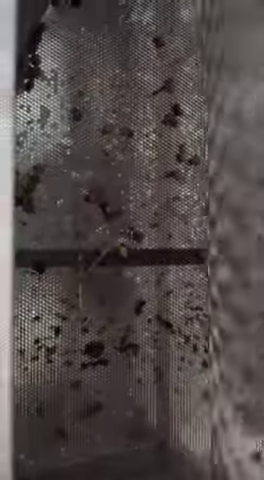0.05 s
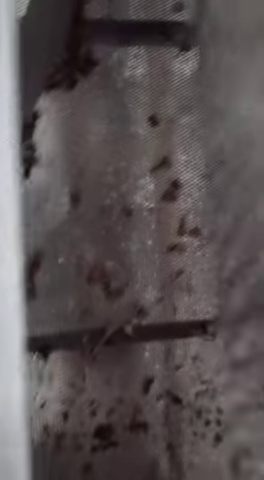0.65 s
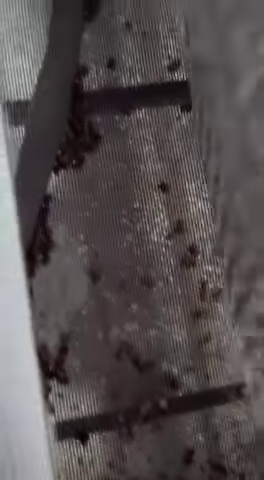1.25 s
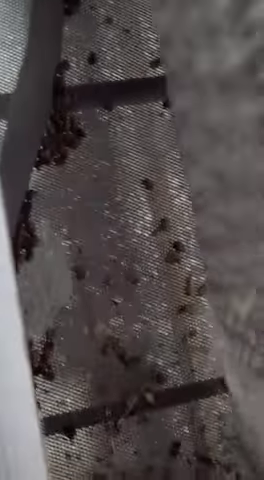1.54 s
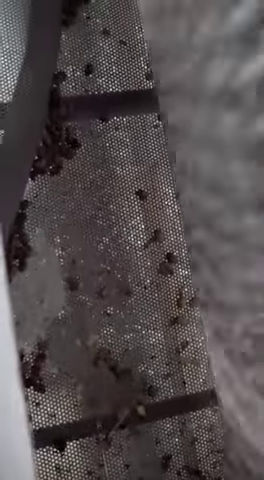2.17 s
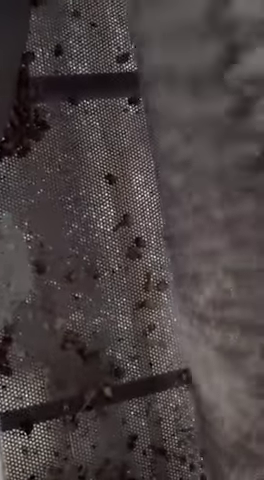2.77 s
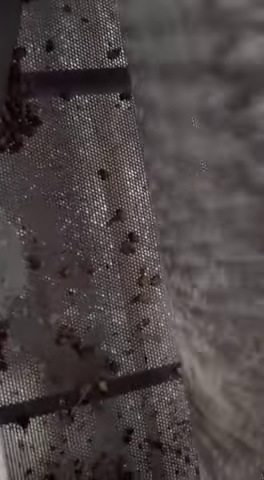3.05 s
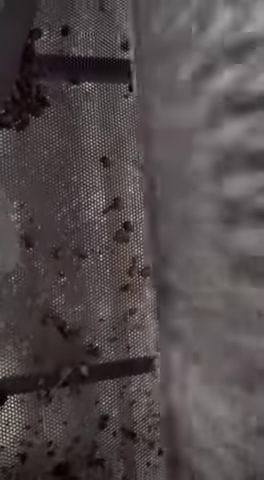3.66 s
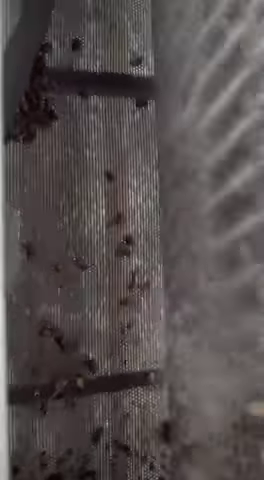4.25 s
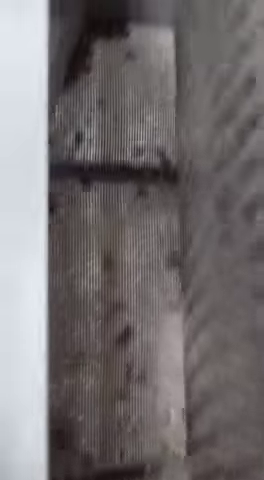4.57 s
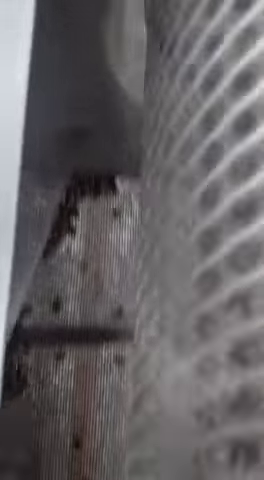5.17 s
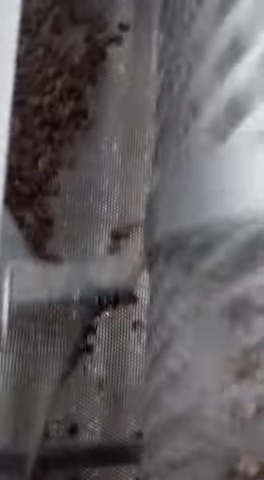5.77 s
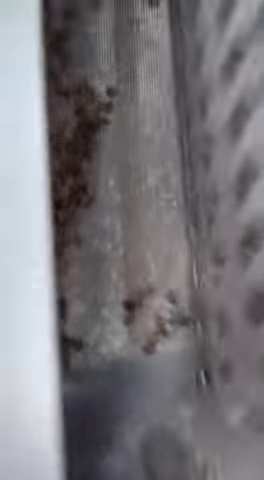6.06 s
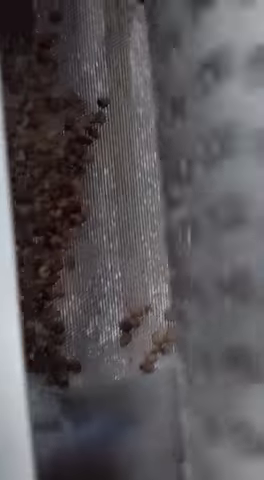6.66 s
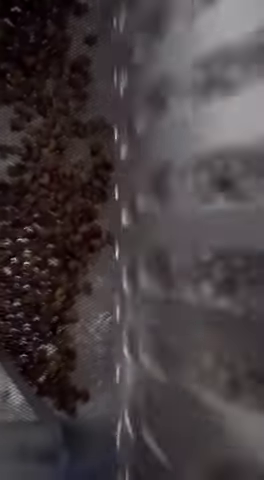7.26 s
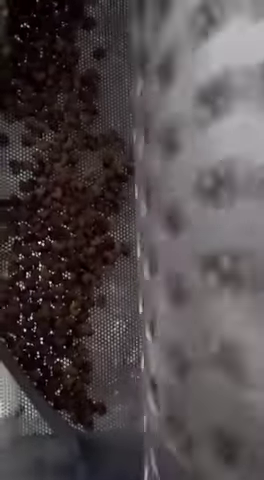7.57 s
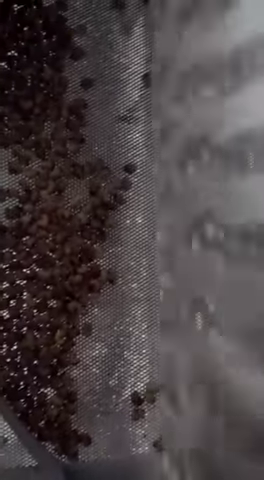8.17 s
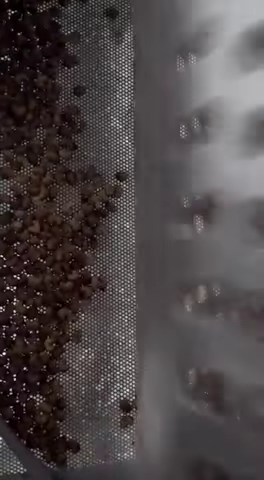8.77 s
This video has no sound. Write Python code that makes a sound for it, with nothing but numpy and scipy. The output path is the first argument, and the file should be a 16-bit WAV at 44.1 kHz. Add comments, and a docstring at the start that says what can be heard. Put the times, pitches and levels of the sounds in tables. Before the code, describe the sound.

A sorting machine runs loudly up close, with nuts sliding over wire mesh in a dense rattle that surges about once a second. The steel frame roars and rings, shells hiss, and a few single nuts tick above a rumbling drive and soft low thuds. Halfway through, the microphone moves from the bare screen to a heap of nuts, where the ringing fades a little and hollow notes swell from the trough.

```python
"""A dense rattle of nuts sliding over wire mesh, surging about once a second: a sorting machine up close.
The load drums on the sheet-steel frame, which roars and rings; shells hiss and a few single nuts tick.
Underneath, the drive rumbles and soft low thuds come and go. Halfway through, a strongly widened stereo
microphone moves from the bare screen to the heap, where the trough swells with a hollow note."""
import sys
import numpy as np
from scipy import signal
from scipy.fft import rfft, irfft, next_fast_len
from scipy.io import wavfile
from scipy.ndimage import uniform_filter1d, map_coordinates

SR = 44100
rng = np.random.default_rng(int(sys.argv[2]) if len(sys.argv) > 2 else 0)


def persist_wave(psi):
    """Save psi, clipped to +-1, as 16-bit WAV."""
    counts = np.round(np.clip(psi, -1, 1) * 32767).astype(np.int16)
    wavfile.write(sys.argv[1], SR, np.atleast_2d(counts).T)


N = 388962


# sprays of shells skidding across the wire: crest t/s, length/s, rise/dB
SPRAYS = [(1.26, .18, 1), (1.65, .2, 1), (2.25, 0.18, 0.8), (2.86, 0.14, 1.5), (3.28, 0.33, 1.1),
          (4.41, 0.13, 0), (4.6, .14, 0), (4.82, 0.26, 2.4), (5.12, .18, 2.5), (5.65, 0.17, 3),
          (5.9, .24, 0), (6.64, 0.34, 1.2), (6.95, 0.13, 1.5), (7.74, .22, 1), (8.06, .24, -0.2),
          (8.53, 0.13, 3.3)]
# rattle colour over the bare screen and over the heap: f/Hz, level/dB
SCREEN_RATTLE = [(700, -55), (1600, -2), (2200, 1), (2600, 2.5), (2950, -3), (3400, -0.9), (4200, -10),
                 (5000, -17), (6300, -17), (9000, -25.5), (15000, -65)]
HEAP_RATTLE = [(700, -52), (1600, -6.5), (2200, 1.5), (2600, -0.5), (2950, 0), (3400, 0.5), (4200, -10),
               (5000, -10), (6300, -21), (9000, -29), (15000, -52)]
def rattle():
    """Shells clatter together in a bright, dense stream that lifts with each spray."""
    clatter = along_screen(contacts(rate=30000, spread_db=2.0), SCREEN_RATTLE, HEAP_RATTLE)
    rattle_db = level(screen_db=-14.5, heap_db=-15, follows=0.044) + 0.76 * swells(SPRAYS)
    return amp(rattle_db + 0.78 * wobble(16)) * clatter


# batches of nuts tumbling onto the frame: crest t/s, length/s, rise/dB
TUMBLES = [(.27, 0.2, 1.5), (.98, 0.18, 0.5), (1.38, .1, -1), (1.66, 0.095, 1), (1.87, .14, -0.5),
           (2.05, 0.086, 2.5), (2.22, 0.24, 0), (2.81, 0.24, 1), (3.15, 0.26, 1.5), (3.76, .12, 0),
           (4.05, 0.23, 2), (4.44, .1, 2), (5.07, .15, 1.5), (5.32, .18, 2), (6.14, 0.41, 3.5),
           (6.44, .2, 1), (6.83, 0.31, 5), (7.45, .14, 1), (8.12, .14, 1.5), (8.73, 0.26, 6.5)]
# roar colour over the bare screen and over the heap: f/Hz, level/dB
SCREEN_ROAR = [(300, -25), (720, -6), (1100, -1), (1450, 1), (1800, 1), (2500, 0), (3000, -21), (4500, -40),
               (9000, -62)]
HEAP_ROAR = [(300, -29), (720, -10), (1000, -6.5), (1280, -3.5), (1450, -3.5), (1620, -1.5), (1800, -1),
             (2100, -5.5), (2550, -5), (3000, -25), (4500, -23.5), (9000, -72)]
def roar():
    """The sliding load drums on the steel frame and booms when a batch tumbles."""
    drumming = along_screen(contacts(rate=22000, spread_db=1.5), SCREEN_ROAR, HEAP_ROAR)
    roar_db = level(screen_db=-18, heap_db=-18, follows=0.46) + swells(TUMBLES)
    return amp(roar_db + 0.59 * wobble(22)) * drumming


# ringing modes of the steel panels: f/Hz, width/Hz, level/dB
PANEL_MODES = [(820, 22, -13), (926, 12, -5), (1050, 28, -10.5), (1247, 23, 0), (1535, 28, -2),
               (2010, 30, -2.5), (2580, 90, -5.5)]
# shakes that make the panels ring louder: crest t/s, length/s, rise/dB
SHAKES = [(.3, .42, 6), (.99, .24, 4.5), (1.39, .12, 7), (1.91, .2, 5.5), (2.21, .16, 9), (2.83, .2, 5.5),
          (3.18, .2, 6), (3.55, .14, 4.5), (3.77, .17, 6.5), (3.92, .14, 5)]
def panels():
    """Each panel mode sings as a wavering tone that swells when shaken, fainter over the heap."""
    shake_db = swells(SHAKES) + 0.33 * swells(TUMBLES)
    ring = sum(amp(db) * singing(hz, width_hz, evenness=.35, waver_hz=5)
               for hz, width_hz, db in PANEL_MODES)
    return amp(level(screen_db=-27.5, heap_db=-32.5, follows=0.14) + shake_db) * ring


# hollow notes of the trough: crest t/s, length/s, f/Hz, level/dB
HOLLOW_NOTES = [(5.89, 0.46, 1660, -18.5), (5.892, 0.26, 3300, -22), (6.84, 0.28, 1750, -17),
                (7.418, 0.18, 2060, -16.5), (7.756, 0.24, 1820, -15.5), (7.76, .3, 2580, -29),
                (7.76, 0.25, 3150, -24), (8.09, 0.49, 1880, -17), (8.062, 0.41, 2530, -21),
                (8.757, 0.21, 1820, -17)]
def trough():
    """The sliding heap sets the trough resonating: hollow bands swell and fade at varying pitches."""
    return sum(amp(db) * swells([(s, length, 1)]) * resonance(hz, width_hz=190)
               for s, length, hz, db in HOLLOW_NOTES)


# colour of sliding shells: f/Hz, level/dB
SLIDE_COLOUR = [(2500, -37), (3900, 1.5), (4400, 1.5), (5100, 0), (6000, -12.5), (7500, -35)]
def slide():
    """Shells slide over the mesh with a thin rasp, strongest over the bare screen."""
    slide_db = level(screen_db=-29, heap_db=-33.5, follows=0.5) + swells(SPRAYS) + 1.5 * wobble(20)
    return amp(slide_db) * coloured(contacts(rate=20000, spread_db=2.5), SLIDE_COLOUR)


# colour of brushed wire: f/Hz, level/dB
HISS_COLOUR = [(3000, -37), (6000, -2), (7200, -1), (8800, 2.5), (10000, 1.2), (11500, -6), (13000, -12),
               (14700, -12.5), (15500, -12)]
def hiss():
    """Shells brush the wires: an airy top that rides the surges and sprays."""
    hiss_db = level(screen_db=-32, heap_db=-28.5, follows=0.77) + swells(SPRAYS) + 1.1 * wobble(21)
    return amp(hiss_db) * coloured(contacts(rate=39000, spread_db=3.5), HISS_COLOUR)


# colour of the finest grit: f/Hz, level/dB
SIZZLE_COLOUR = [(9000, -35), (11500, -3), (12800, -3), (14000, -11), (15500, -10)]
def sizzle():
    """Fine shell grit sizzles on the wires, flaring with each surge and spray."""
    grit = coloured(contacts(rate=9800, spread_db=4.0), SIZZLE_COLOUR)
    flare_db = 1.5 * swells(SPRAYS) - swells(LULLS) + 2.0 * wobble(14)
    return amp(level(screen_db=-49, heap_db=-42.5, follows=0.88) + flare_db) * grit


# single nuts striking nearby: t/s, level/dB
NUT_HITS = [(1.1019, -24), (1.8474, -27), (4.3844, -23), (4.8654, -27), (5.1664, -30), (6.5294, -28),
            (6.6124, -27), (7.7464, -25)]
def ticks(t60, gain_db):
    """Single nuts hit the steel: short, bright bursts."""
    bright = coloured(noise(), [(1000, -25), (3500, -2), (9000, 17), (15000, -17)])
    return amp(gain_db) * blows(NUT_HITS, t60) * bright


# colour of the drive: f/Hz, level/dB
RUMBLE_COLOUR = [(20, -46), (70, -25), (105, -14), (140, -6.5), (175, -10), (220, -2.5), (300, -2),
                 (400, 0), (550, 1), (700, -4), (1100, -6), (2000, -18), (5000, -45)]
# low modes of the frame: f/Hz, width/Hz, level over the screen/dB, level over the heap/dB
FRAME_MODES = [(300, 18, -46, -44), (362, 18, -37.5, -47), (395, 24, -41.5, -43), (490, 35, -38.5, -40.5),
               (620, 35, -43, -42.5)]
def drive():
    """The drive rumbles and the frame's low drone comes and goes, both heavier under the load."""
    rumble_db = level(screen_db=-31.5, heap_db=-37.5, follows=0.078) + 0.63 * wobble(5.4)
    rumble = amp(rumble_db) * coloured(noise(), RUMBLE_COLOUR)
    drone = 0
    for hz, width_hz, screen_db, heap_db in FRAME_MODES:
        drift = unit(amp(2.5 * wobble(5)))
        drone += amp(level(screen_db, heap_db, follows=1.0)) * drift * resonance(hz, width_hz)
    return amp(1.1 * swells(TUMBLES)) * (rumble + drone)


# soft, dull thuds: t/s, level/dB
THUDS = [(.47, -17), (.975, -24), (1.09, -22.5), (2.082, -16.5), (2.32, -25), (3.83, -21), (4.84, -24),
         (5.389, -26), (5.769, -25), (6.94, -22), (7.694, -23), (7.79, -13.5), (7.96, -22.5), (8.54, -18),
         (8.7, -17.5)]
def thuds():
    """Soft, dull low thuds, nearly alike at both microphone ports and half buried in the roar."""
    centred = rng.standard_normal(N) + .25 * noise()
    dull = coloured(centred, [(25, -32), (55, -10), (100, 0), (260, 2), (600, -15), (2000, -80)])
    return blows(THUDS, t60=.12) * dull


# colour of a soft jolt of the housing: f/Hz, level/dB
KNOCK_COLOUR = [(25, -25), (60, -11), (130, -3), (230, 0), (330, -3), (560, -6), (900, -30), (2000, -70)]
def knocks(rate, t60, spread_db, gain_db):
    """The shaking housing jolts at uneven moments: soft, low knocks that make the rumble flutter."""
    struck = rng.random(N) < rate / SR
    size = amp(spread_db * np.clip(rng.standard_normal(N), -1.5, 1.5))
    fade = amp(-60 * np.arange(SR // 2) / SR / t60)
    power = np.abs(signal.fftconvolve((struck * size) ** 2, fade ** 2)[:N])
    jolts = unit(np.sqrt(power) * coloured(noise(), KNOCK_COLOUR))
    return amp(level(gain_db, gain_db, follows=0.067)) * jolts


# the load surges over the mesh: crest t/s, length/s, rise/dB
SURGES = [(.27, 0.43, 3), (.98, 0.59, 5.5), (1.92, 0.58, 3), (2.86, 0.45, 4), (3.99, 0.96, 2),
          (4.94, 0.86, 3.5), (5.9, 0.5, 3.5), (6.74, 0.81, 4), (7.8, 0.89, 3.5), (8.69, 0.77, 4.5)]
# the flow slackens: lowest point t/s, length/s, fall/dB
LULLS = [(.58, 0.28, 2), (1.49, 0.53, 1.2), (2.48, 0.2, 1.4), (3.02, .1, 0.5), (3.48, 0.19, 1),
         (5.46, 0.14, 2.5), (7.1, 0.23, 0.5), (7.3, 0.14, 1.5), (7.55, 0.13, .8), (8.3, 0.41, 0.7),
         (8.61, 0.22, 2)]
def level(screen_db, heap_db, follows):
    """A layer's fader in dB: set by mic position, up `follows` dB per dB of surge, down in the lulls."""
    return screen_db + (heap_db - screen_db) * mic_position() + follows * swells(SURGES) - swells(LULLS)


# the microphone's move: t/s, position (0 over the bare screen, 1 over the heap)
MIC_PATH = [(0, 0), (4.2, 0), (5.0, .6), (5.8, 1), (8.82, 1)]
def mic_position():
    """Where the microphone is at each sample."""
    return np.interp(np.arange(N) / SR, *np.transpose(MIC_PATH))


def along_screen(x, at_screen, at_heap):
    """Crossfades the colour of x as the microphone moves from the bare screen to the heap."""
    position = mic_position()
    return (1 - position) * coloured(x, at_screen) + position * coloured(x, at_heap)


def contacts(rate, spread_db):
    """Random tiny impacts, rate a second: mostly weak, a few strong, shared unevenly by the ports."""
    struck = rng.random(N) < rate / SR
    size = amp(spread_db * np.clip(rng.standard_normal(N), -2, 2))
    return unit(struck * size * noise())


def resonance(centre_hz, width_hz):
    """A randomly shaken mode at rms 1; its skirts fall steeply."""
    return unit(filtered(noise(), lambda hz: 1 / (1 + ((hz - centre_hz) / width_hz) ** 2)))


def singing(centre_hz, width_hz, evenness, waver_hz):
    """A ringing mode: the shaking holds its strength partly even while its pitch wavers."""
    ring = signal.hilbert(resonance(centre_hz, width_hz), next_fast_len(N))[:, :N]
    waver = np.exp(2j * np.pi * np.cumsum(waver_hz * wobble(9)) / SR)
    return unit(np.real(ring * waver) / (np.abs(ring) + 1e-3) ** evenness)


def blows(rows, t60):
    """The envelope of sudden blows that each die away by 60 dB in t60 seconds."""
    t = np.arange(N) / SR
    return sum(amp(db - 60 * np.abs(t - s) / t60) * (t >= s) for s, db in rows)


def swells(rows):
    """Smooth rises and falls of the given heights, each centred on its time."""
    t = np.arange(N) / SR
    return sum(height * np.cos(np.pi * np.clip((t - s) / length, -.5, .5)) ** 2
               for s, length, height in rows)


def wobble(rate):
    """A smooth random curve, rate knots a second."""
    return map_coordinates(rng.standard_normal(int(N * rate / SR) + 4), [np.arange(N) * rate / SR])


def noise():
    """Unrelated noise at the two ports."""
    return rng.standard_normal((2, N))


def coloured(x, spectrum):
    """x given a spectrum's shape, at rms 1."""
    return unit(filtered(x, lambda hz: amp(along(spectrum, hz))))


def filtered(x, response):
    """x times a complex response of frequency."""
    size = next_fast_len(N + SR // 2)
    return irfft(rfft(x, size) * response(np.fft.rfftfreq(size, 1 / SR)), size)[..., :N]


def along(points, hz):
    """Joins (f/Hz, value) points on a log frequency axis."""
    freqs, values = np.transpose(points)
    return np.interp(np.log(hz + 1), np.log(freqs + 1), values)


def amp(db):
    return 10 ** (np.asarray(db) / 20)


def unit(x):
    return x / np.sqrt(np.mean(x ** 2) + 1e-20)


def scene():
    """The machine as it reaches the microphone's two ports."""
    low_end = drive() + thuds() + knocks(rate=9, t60=.16, spread_db=2.5, gain_db=-37.5)
    nuts = rattle() + roar() + slide() + hiss() + sizzle()
    return nuts + panels() + trough() + ticks(t60=0.082, gain_db=-1) + low_end


# crossfeed between the ports: f/Hz, share subtracted (negative: added)
CROSSFEED = [(50, 0.76), (150, 1), (500, 0.7), (1150, 0.44), (1800, 0.78), (2600, 0.2), (3200, 0.54),
             (4600, 0.33), (6400, 0.53), (8200, 0.32), (9500, 0.4), (10800, -0.16), (12000, -0.35),
             (15000, -0.67)]
# EQ that thins the low notes in the centre: f/Hz, level/dB
MID_EQ = [(50, 0), (110, -3), (170, -10), (220, -20), (270, -19), (350, -10.5), (500, -8), (750, -5),
          (1300, 0)]
def widen(ports, delay_ms):
    """Each side loses a delayed copy of the other, so bands alternate between centred and wide."""
    left, right = ports
    feed = lambda hz: along(CROSSFEED, hz) * np.exp(-2j * np.pi * hz * delay_ms / 1000)
    trim = lambda hz: 1 / np.sqrt(1 + along(CROSSFEED, hz) ** 2)  # offsets the power the feed adds
    mid = filtered((left + right) / 2, lambda hz: (1 - feed(hz)) * trim(hz) * amp(along(MID_EQ, hz)))
    side = filtered((left - right) / 2, lambda hz: (1 + feed(hz)) * trim(hz))
    return np.array([mid + side, mid - side])


def gain_control(x, threshold_db, slope, average_s):
    """The whole mix ducks by `slope` dB for each dB its average power passes the threshold."""
    power = np.abs(uniform_filter1d(np.mean(x ** 2, axis=0), int(average_s * SR)))
    over_db = np.maximum(10 * np.log10(power + 1e-12) - threshold_db, 0)
    return x * amp(-slope * over_db)


# stereo balance, leaning mostly left: f/Hz, left minus right/dB
BALANCE = [(300, .8), (900, 1.8), (2000, .1), (3200, 2.4), (6500, 1.4), (8700, -.5), (11500, 2.2)]
def record(dry):
    """Stereo widening, a slightly louder left side, gain control, rounded peaks and a high cut."""
    wide = widen(dry, delay_ms=.313)
    wide = filtered(wide, lambda hz: amp(np.outer([1, -1], along(BALANCE, hz)) / 2))
    pan_db = np.interp(mic_position(), [0, 1], [-.35, .15])  # the machine lies further left over the heap
    panned = wide * amp(np.outer([1, -1], pan_db) / 2)
    ducked = gain_control(panned, threshold_db=-10.5, slope=0.47, average_s=0.14)
    rounded = ducked / (1 + np.abs(ducked / 1.05) ** 10) ** (1 / 10)
    return filtered(rounded, lambda hz: hz < 15480)


dry = scene()
out = record(dry)
persist_wave(out)
```